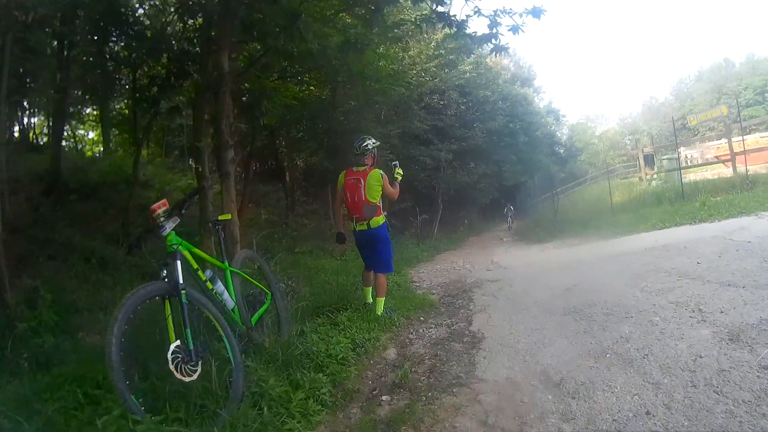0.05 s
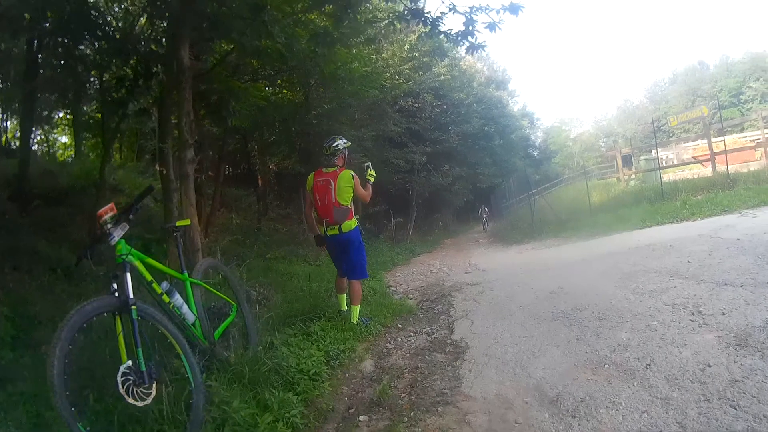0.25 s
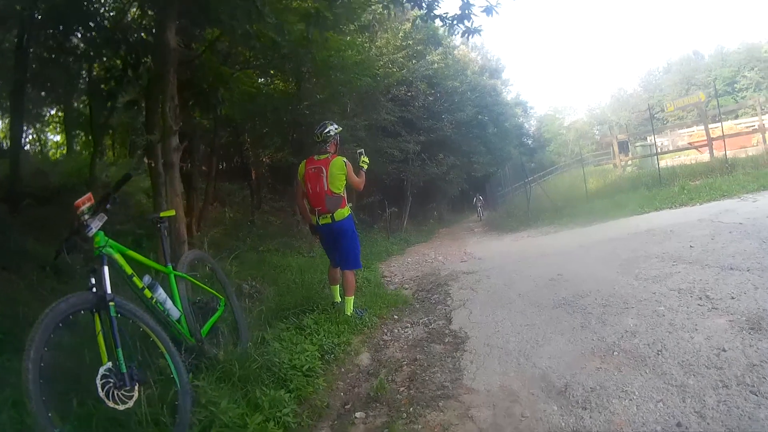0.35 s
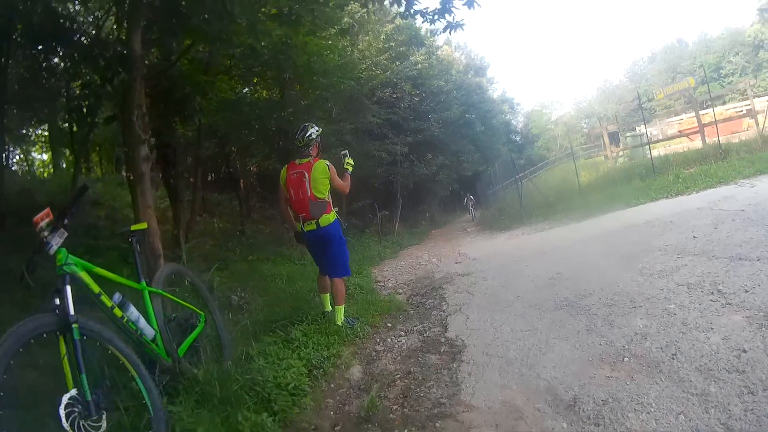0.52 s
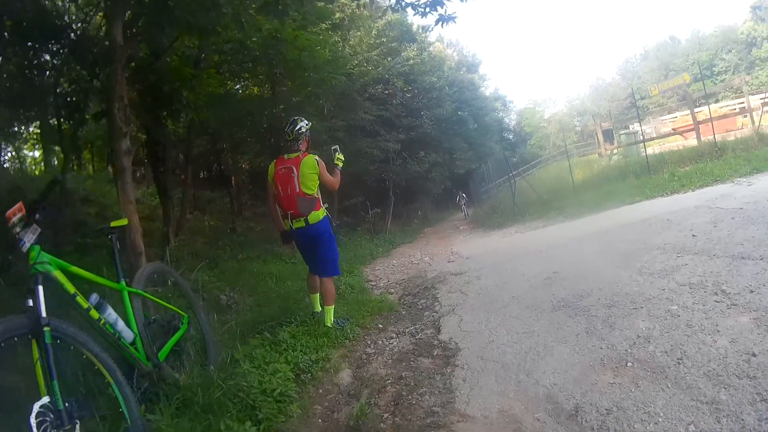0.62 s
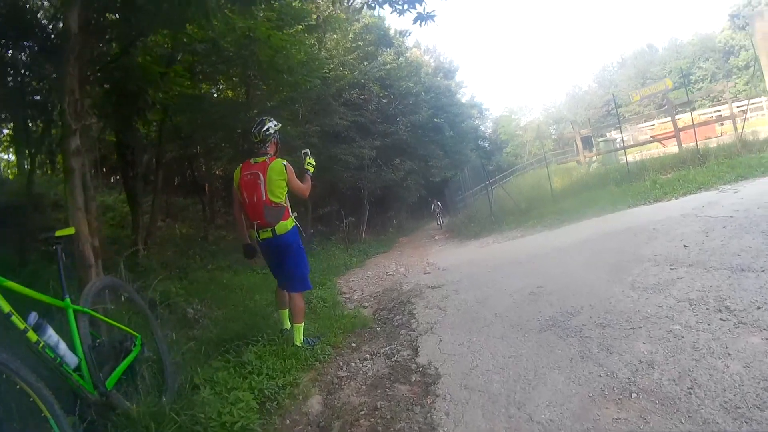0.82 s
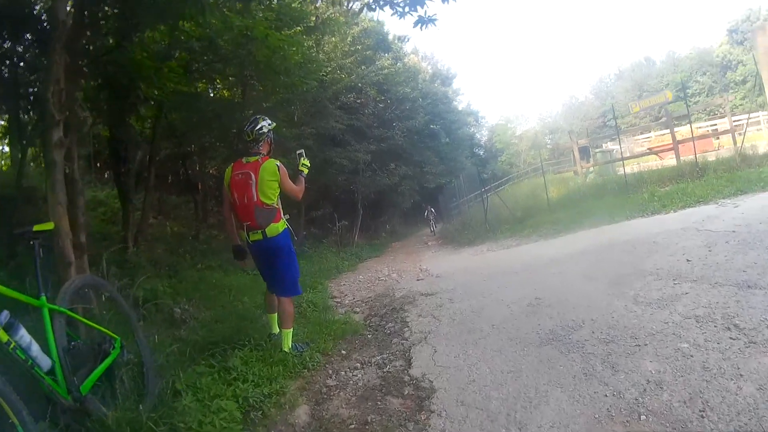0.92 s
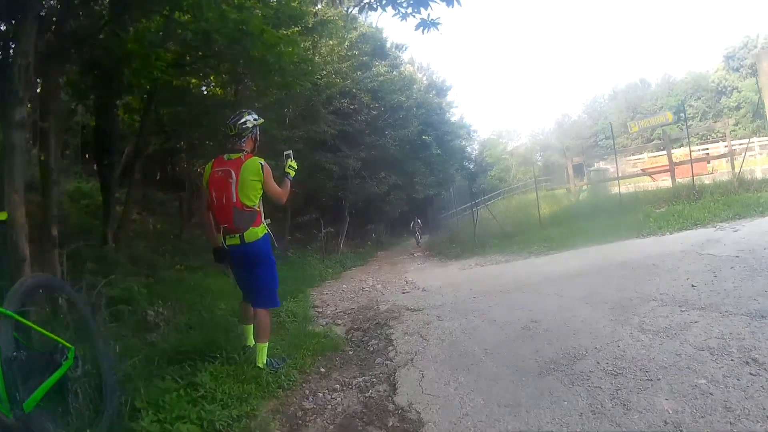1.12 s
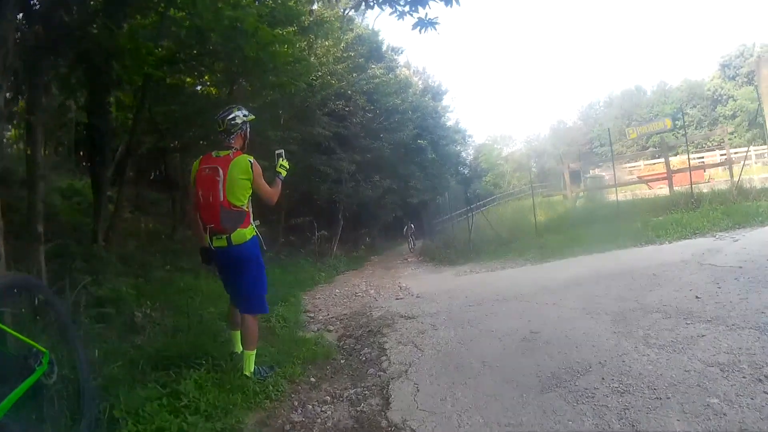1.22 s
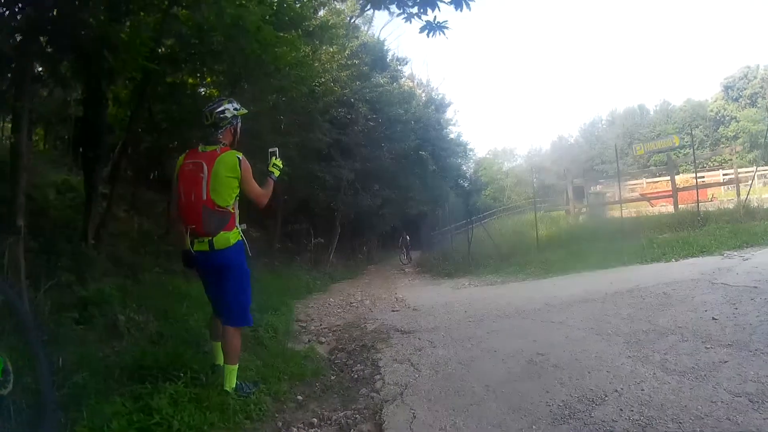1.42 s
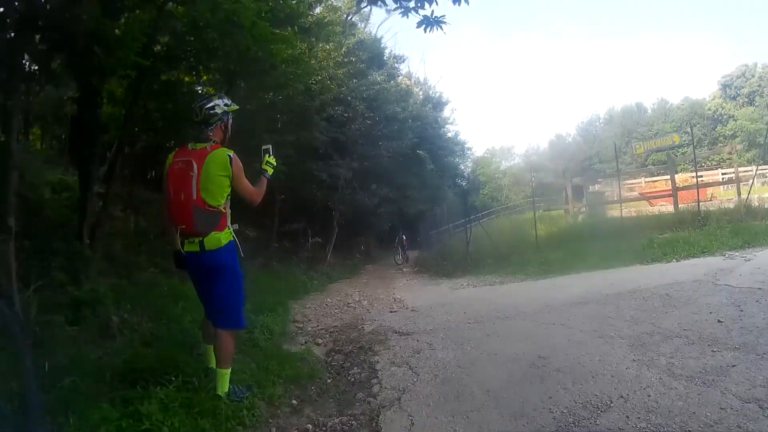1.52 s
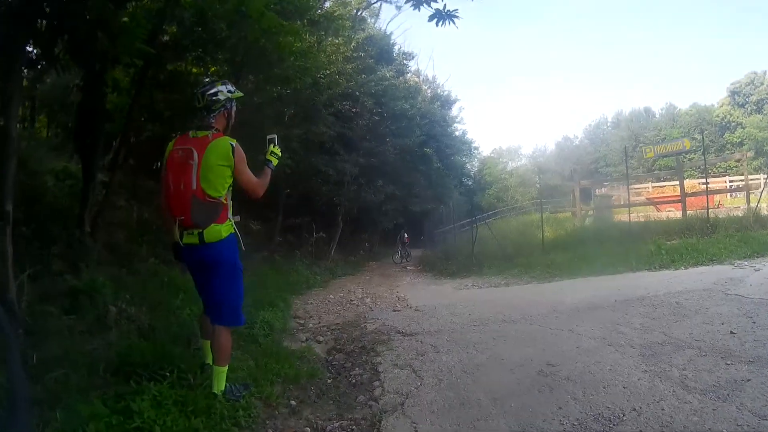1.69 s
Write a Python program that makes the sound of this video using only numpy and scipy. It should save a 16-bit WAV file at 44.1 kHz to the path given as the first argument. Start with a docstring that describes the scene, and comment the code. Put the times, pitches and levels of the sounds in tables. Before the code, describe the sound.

Slow bicycle tyres crunch over gravel, close and outdoors. Soft rumble and faint grit open; from 0.2 to 0.6 seconds stones crack hard, slightly overloading, with hollow knocks and bass bumps. The crunch thins, with separate knocks near 0.84, 0.9 and 1.13. A strong double thud lands around 1.37 and 1.42 with gritty scuffing, then only faint stone ticks near 1.65 over light hiss.

```python
"""On a gravel track, bicycle tyres roll slowly and come to a stop, close to the microphone.
Stones crack under the tread (sharp pushes), knock together (short hollow modes) and spit grit (noise snaps).
Pebbles clack, the tread scuffs loose grit, and bumps thud through the bike as short bass swings.
Rolling is rumbling noise and random clicks; stones leave a noise tail, over a faint hiss.
The crunch is dense at first, then thins to single stones, with a strong double thud near the end."""
import sys
import numpy as np
from scipy import signal
from scipy.io import wavfile
from scipy.ndimage import uniform_filter1d

SR = 44100
rng = np.random.default_rng(int(sys.argv[2]) if len(sys.argv) > 2 else 0)


def persist_wave(psi):
    """Save psi, clipped to +-1, as 16-bit WAV."""
    counts = np.round(np.clip(psi, -1, 1) * 32767).astype(np.int16)
    wavfile.write(sys.argv[1], SR, np.atleast_2d(counts).T)


N = 77175  # samples, 1.75 s
T = np.arange(N) / SR
BRIEF = T[:4096]  # time axis of one short sound, about 93 ms


def amp(db):
    """Turns decibels into gain."""
    return 10 ** (np.asarray(db) / 20)


def evened(x):
    """Scales a steady sound to rms 1."""
    return x / np.sqrt(np.mean(x ** 2) + 1e-20)


def blow(x):
    """Scales a short sound to the energy of one millisecond at full level."""
    return x / np.sqrt(np.sum(x ** 2) * 1000 / SR + 1e-20)


def add(mix, start_s, sound):
    """Mixes a sound in at its start time, cutting what runs past the end."""
    part = mix[max(round(start_s * SR), 0):][:len(sound)]
    part += sound[:len(part)]


def colour(x, points, tilt_db=0):
    """Filters through (Hz, dB) points, tilted per octave above the second point, with no pre-echo."""
    size = 8192
    octave = np.log2(abs(np.fft.fftfreq(size, 1 / SR)) + 1)
    hz, db = np.transpose(points)
    tilt = tilt_db * np.maximum(octave - np.log2(hz[1]), 0)
    log_gain = np.log(amp(np.interp(octave, np.log2(hz), db) + tilt))
    # The Hilbert transform finds the minimum phase that belongs to this gain
    spectrum = np.exp(np.conj(signal.hilbert(log_gain)))
    kernel = np.fft.ifft(spectrum).real[:size // 2]
    return signal.fftconvolve(x, kernel)[:len(x)]


def burst(decay_s):
    """Makes a brief puff of dying noise."""
    return rng.standard_normal(len(BRIEF)) * np.exp(-BRIEF / decay_s)


def patter(per_s, spread_db):
    """Scatters random clicks of very unequal size."""
    size = amp(spread_db * np.minimum(rng.exponential(1, N), 4))
    sign = rng.choice([-1, 1], N)
    return size * sign * (rng.random(N) < per_s / SR)


def swell(swell_s, decay_s):
    """Shapes a soft rise and an exponential fall."""
    rise = (1 - np.exp(-(BRIEF / swell_s) ** 2)) ** 2
    return rise * np.exp(-BRIEF / decay_s)


# Stones cracking under the tread: start_s, level_db, brightness_db_per_octave
CRACKS = [(.009, -21.5, -3.5), (0.2073, -5.5, -0.5), (.218, -16, 6.5), (0.2279, 0.5, -0.5), (.2335, -15, 0),
          (0.2403, -15, 8), (.2523, -11.5, 3), (0.2919, -24, 10), (.302, -13.5, 0.5), (.318, 1, 0),
          (.323, -9.5, -1.5), (0.3424, -17, 8), (.353, 0.5, 0.5), (0.3663, -9.5, 6.5), (0.3682, -4, 1.5),
          (.376, -3.5, -2), (.3785, -11, 6), (0.43, -6.5, -1.5), (0.4457, -17.5, 6.5), (.448, -15.5, 1),
          (1.024, -18.5, -0.5), (1.3728, -20.5, 2.5), (1.377, -22, 0.5), (1.4042, -13.5, -6.5),
          (1.417, -20, 1.5)]
# Tone of the push: frequency_hz, gain_db
CRACK_COLOUR = [(40, -1), (130, -3), (300, -7.5), (510, 7), (640, 2), (770, 0.5), (980, -7.5), (1400, -12),
                (1850, -7), (2600, -20), (4000, -24.5), (5600, -29.5), (8000, -67), (16000, -88)]
# Tone of the grating and the splinters: frequency_hz, gain_db
SPLINTER_COLOUR = [(100, -18.5), (700, -2.5), (1300, 3.5), (1900, 6.5), (2600, -7.5), (3800, -4.5),
                   (5600, -15), (7500, -23.5), (11000, -31.5), (16000, -39)]
SPLINTER_DB, SPLINTER_S = -13.5, 0.0025  # level for a crack of brightness 0, decay
STRAIN_SHARE, STRAIN_S, LEAD_S = .3, 0.0012, .008  # grating before the break: strength, swell, longest lead


def cracks():
    """A stone grates, gives way in one sharp push, and splinters follow."""
    out = np.zeros(N)
    lead = int(LEAD_S * SR)
    for start_s, level_db, bright_db in CRACKS:
        impulse = 1. * (BRIEF == 0)
        push = -blow(colour(impulse, CRACK_COLOUR, bright_db))
        grating = STRAIN_SHARE * burst(STRAIN_S)[:lead][::-1]  # reversed, so it grows
        splinters = blow(colour(np.r_[grating, burst(SPLINTER_S)], SPLINTER_COLOUR))
        add(out, start_s, amp(level_db) * push)
        # Brighter cracks splinter more loudly
        add(out, start_s - LEAD_S, amp(level_db + SPLINTER_DB + 2 * bright_db) * splinters)
    return out


# Stones knocking together: start_s, level_db, pitch_hz, brightness_db_per_octave
KNOCKS = [(.0505, -27, 1250, -10), (.085, -30, 1220, -13), (.1395, -25.5, 1270, -11),
          (.404, -3.5, 1214, 4.5), (.4465, -16, 1462, 9.5), (0.455, -18, 1285, 7),
          (0.5184, -14.5, 1240, 4.5), (.5305, -17.5, 1230, 2), (0.5356, 0, 1229, 2),
          (.5445, -7, 1093, -5.5), (0.557, -8, 1161, -0.5), (.594, -14.5, 1200, 1), (.604, -25.5, 1190, 2),
          (0.6253, -17.5, 1173, -4.5), (.651, -20, 1140, -2.5), (.698, -23.5, 1183, 6),
          (0.707, -28, 1260, -7), (.784, -27.5, 1257, 4), (.812, -24, 1198, 4), (.838, -8, 1146, 1.5),
          (0.9056, -6.5, 1156, 1.5), (1.126, -8.5, 1255, 4.5), (1.366, -23.5, 1250, 1),
          (1.403, -16.5, 1140, -11), (1.45, -21.5, 1286, -3), (1.5125, -38.5, 1194, 9),
          (1.636, -36, 1640, -6), (1.657, -23, 1269, -1.5), (1.663, -24, 1166, -8),
          (1.7265, -22.5, 1180, 6)]
# What a knock rings with: ratio_to_pitch, level_db, swell_s, decay_s, share_it_starts_sharp
KNOCK_MODES = [(.46, -5, 0.0047, 0.0046, 0.0097), (.66, -10.5, 0.003, 0.0099, 0.022),
               (.93, 1, .003, 0.0024, 0.36), (1.13, -5.5, 0.0034, 0.003, 0.016),
               (1.42, -9, 0.0032, 0.0027, 0.014), (2.55, -26, 0.002, 0.0046, 0.017),
               (3.1, -36.5, 0.0012, 0.006, 0.07)]
# Tone of the scrape in each knock: frequency_hz, gain_db
SCRAPE_COLOUR = [(100, 6.5), (930, -2.5), (1060, 10), (1400, 11.5), (1850, 3), (2150, -7), (3200, -18),
                 (4200, -21.5), (6000, -52), (16000, -53)]
SCRAPE_DB, SCRAPE_S = -7.5, 0.0017  # level against the ringing, noise decay
GLIDE_S = 0.0028  # time for the pitch to settle


def knocks():
    """Hollow modes swell, sag in pitch and die within milliseconds, with a rough scrape."""
    out = np.zeros(N)
    settle = GLIDE_S * (1 - np.exp(-BRIEF / GLIDE_S))
    for start_s, level_db, pitch_hz, bright_db in KNOCKS:
        ring = 0
        for ratio, mode_db, swell_s, decay_s, sharp in KNOCK_MODES:
            cycles = pitch_hz * ratio * (BRIEF + sharp * settle)
            wave = np.sin(2 * np.pi * (cycles + rng.random()))
            mode = blow(swell(swell_s, decay_s) * wave)
            ring = ring + amp(mode_db + bright_db * np.log2(ratio)) * mode
        scrape = blow(colour(BRIEF * burst(SCRAPE_S), SCRAPE_COLOUR, bright_db))
        add(out, start_s, amp(level_db) * blow(blow(ring) + amp(SCRAPE_DB) * scrape))
    return out


# Grit snapping: start_s, level_db
GRIT = [(.0053, -30.5), (0.0157, -28), (0.056, -35), (.16, -22), (0.209, -22), (0.216, -18), (0.228, -33),
        (0.2317, -28), (0.241, -36), (.2473, -22), (0.2536, -17), (.264, -33), (0.2948, -15.5),
        (0.301, -38), (0.3217, -19), (.341, -37), (0.354, -14.5), (0.3688, -29), (0.377, -56), (0.382, -47),
        (0.445, -35), (.4568, -30), (0.462, -26), (0.4686, -28), (0.4808, -28), (0.489, -37), (0.4955, -32),
        (0.5023, -23), (0.541, -20.5), (.545, -24), (0.593, -27), (0.643, -33), (0.653, -37), (0.665, -33),
        (0.7366, -35.5), (0.771, -22), (0.8778, -33), (0.888, -36), (1.033, -29.5), (1.122, -32.5),
        (1.147, -33.5), (1.1828, -26.5), (1.228, -35), (1.259, -39), (1.2904, -27), (1.3772, -19.5),
        (1.3849, -24), (1.4159, -30), (1.4202, -25), (1.4313, -26), (1.4431, -22.5), (1.467, -32)]
# Tone of grit, also used for the fine grit in rolling: frequency_hz, gain_db
GRIT_COLOUR = [(100, 27), (900, 5), (1800, 5.5), (2700, -1.5), (4200, -1), (5600, 1.5), (7000, -5),
               (9000, -8.5), (11400, -5.5), (12500, -16.5), (16000, -28)]
GRIT_RISE_S, GRIT_S = .0006, 0.00034  # rise and decay of the snap
GRIT_TAIL, GRIT_TAIL_S = 0.12, 0.0024  # weaker, longer part: strength, decay


def grit():
    """Tiny bright snaps are puffs of noise with a very short rise and fall."""
    out = np.zeros(N)
    rise = 1 - np.exp(-(BRIEF / GRIT_RISE_S) ** 2)
    for start_s, level_db in GRIT:
        snap = (burst(GRIT_S) + GRIT_TAIL * burst(GRIT_TAIL_S)) * rise
        add(out, start_s, amp(level_db) * blow(colour(snap, GRIT_COLOUR)))
    return out


# Small pebbles clacking: start_s, level_db, pitch_hz
CLACKS = [(.133, -60, 4100), (0.14, -31, 2900), (0.5303, -28, 3100), (0.678, -44, 3150), (0.783, -43, 2980),
          (0.813, -51, 3000), (.961, -54, 2840), (0.984, -48, 2830), (0.992, -45, 3120), (1.119, -34, 2800),
          (1.268, -38.5, 2750), (1.514, -46.5, 2950), (1.513, -50, 4170), (1.712, -49, 2960),
          (1.728, -45, 2680)]
CLACK_SWELL_S, CLACK_DECAY_S = 0.0011, 0.0023
CLACK_ROUGH = .6  # depth of a pebble's chatter


def clacks():
    """Each pebble chatters briefly and rings one short, high mode."""
    out = np.zeros(N)
    for start_s, level_db, pitch_hz in CLACKS:
        wobble = evened(uniform_filter1d(rng.standard_normal(len(BRIEF)), size=50))
        chatter = 1 + CLACK_ROUGH * wobble
        ring = swell(CLACK_SWELL_S, CLACK_DECAY_S) * np.sin(2 * np.pi * pitch_hz * BRIEF)
        add(out, start_s, amp(level_db) * blow(chatter * ring))
    return out


# Tread scuffing over loose grit: start_s, length_s, level_db
SCUFFS = [(.0, 0.045, -45), (0.043, 0.024, -45.5), (0.147, 0.031, -37), (0.234, 0.05, -41.5),
          (0.334, 0.02, -34), (0.428, 0.053, -37), (0.638, 0.027, -45.5), (0.819, 0.059, -45),
          (1.001, 0.034, -53), (1.053, 0.061, -50.5), (1.243, 0.038, -46.5), (1.328, 0.023, -47.5),
          (1.401, 0.071, -41)]
# Tone of the scuffs: frequency_hz, gain_db
SCUFF_COLOUR = [(100, -9), (900, -14.5), (1500, 16.5), (2000, 10.5), (2400, 6), (3100, -8.5), (4200, 10.5),
                (4900, -17), (7000, -9.5), (11400, -20), (12500, -19), (16000, -39)]


def scuffs():
    """Short rushes of many tiny grains are random clicks that swell and fade."""
    level = np.zeros(N)
    for start_s, length_s, level_db in SCUFFS:
        arch = np.hanning(max(int(length_s * SR), 3)) ** .5
        add(level, start_s, amp(level_db) * arch)
    grains = patter(per_s=3100, spread_db=5.5)
    return level * evened(colour(grains, SCUFF_COLOUR))


# Bumps thudding through the bike: start_s, level_db, pitch_hz
THUDS = [(0.034, -19.5, 79), (0.064, -22.5, 178), (.105, -26, 147), (0.175, -19, 89), (0.1481, -14.5, 242),
         (.22, -5, 94), (0.236, -12.5, 139), (0.2444, -10, 235), (0.253, -13, 153), (0.29, -15.5, 131),
         (.302, -7, 139), (0.308, -33, 240), (0.325, -13.5, 121), (0.341, -16, 134), (.357, -6, 146),
         (0.371, -17, 129), (0.429, -17, 172), (.444, -7, 184), (0.496, -15, 190), (0.531, -26, 123),
         (0.55, -13, 213), (0.5845, -13, 228), (0.647, -26, 107), (0.7595, -19, 202), (0.808, -24, 139),
         (0.852, -19, 233), (1.0232, -22.5, 287), (1.357, -15, 65), (1.3723, -5.5, 264), (1.416, -9.5, 240),
         (1.443, -30, 111), (1.657, -28.5, 275)]
THUD_CYCLES = 0.43  # cycles until the swell of a thud peaks
FRAME_HZ, FRAME_DECAY_S, FRAME_DB = 87.2, 0.052, -25.5  # low ring of the bike; level against the thud


def thuds():
    """Each bump is a cycle or two of bass and leaves the bike ringing."""
    out = np.zeros(N)
    t = T[:SR // 2]
    ring = np.exp(-t / FRAME_DECAY_S) * np.sin(2 * np.pi * FRAME_HZ * t)
    for start_s, level_db, pitch_hz in THUDS:
        age = t * pitch_hz / THUD_CYCLES
        envelope = age ** 2 * np.exp(-2 * age)
        bump = blow(-envelope * np.sin(2 * np.pi * pitch_hz * t))
        add(out, start_s, amp(level_db) * (bump + amp(FRAME_DB) * ring))
    return out


JOLT_S, JOLT_DB, JOLT_HZ, JOLT_DECAY_S = 1.417, -27.5, 83.3, 0.049  # start, level, pitch, decay


def shudder():
    """A hard jolt near the end leaves a louder low ring in the bike: one dying sine."""
    age = np.maximum(T - JOLT_S, 0)
    return amp(JOLT_DB) * np.exp(-age / JOLT_DECAY_S) * np.sin(2 * np.pi * JOLT_HZ * age)


# Uneven rolling, swelling and fading: time_s, rumble_db, crunch_db (before the lift below), fine_grit_db
ROLL = [(0.0, -31.5, -43, -35.5), (0.058, -62, -47, -56), (0.154, -38, -45.5, -80), (0.248, -29, -37, -42),
        (0.354, -31, -30.5, -71), (0.394, -26, -34.5, -61), (0.438, -29.5, -27.5, -52),
        (0.51, -34, -34, -64), (0.588, -34, -31, -52), (0.692, -37, -41, -64), (0.798, -37, -40.5, -51),
        (0.872, -43.5, -42.5, -63), (1.106, -39, -43, -56), (1.276, -40, -48.5, -59),
        (1.378, -33, -36, -70), (1.48, -49.5, -52, -54.5), (1.628, -48.5, -54.5, -95),
        (1.75, -39, -42, -57)]
# Tone of the tyre rumble: frequency_hz, gain_db
RUMBLE_COLOUR = [(15, 4.5), (28, -7.5), (50, 3), (68, -4), (88, 9), (115, -6.5), (200, -3), (320, -22),
                 (600, -32), (2000, -80)]
# Tone of the crunch: frequency_hz, gain_db
CRUNCH_COLOUR = [(100, -35), (250, -0.5), (400, 3.5), (530, 9.5), (620, 9), (690, -8), (780, -0.5),
                 (940, -10.5), (1080, 4.5), (1380, -4), (1800, -10), (2200, -23), (3000, -21.5),
                 (4200, -31.5), (5500, -79), (16000, -68)]
CRUNCH_LIFT_DB = 2
LUMP_DB, LUMP_S = 6.5, 0.045  # slow unevenness of the rumble: greatest rise or fall, half window length


def rolling():
    """Tyre rumble is lumpy noise; the crunch of small stones and the fine grit are random clicks."""
    time_s, *levels = np.transpose(ROLL)
    rumble_level, crunch_level, fine_level = (amp(np.interp(T, time_s, level)) for level in levels)
    window = np.hanning(int(2 * LUMP_S * SR))
    lumps = evened(signal.fftconvolve(rng.standard_normal(N), window, "same"))
    lumpy_noise = rng.standard_normal(N) * amp(LUMP_DB * np.tanh(lumps))
    rumble = evened(colour(lumpy_noise, RUMBLE_COLOUR))
    crunch = evened(colour(patter(per_s=840, spread_db=3), CRUNCH_COLOUR))
    fine = evened(colour(patter(per_s=1400, spread_db=7.5), GRIT_COLOUR))
    return rumble_level * rumble + amp(CRUNCH_LIFT_DB) * crunch_level * crunch + fine_level * fine


def after_ring(x, points, t60_s, level_db):
    """A diffuse, coloured tail: each sound is smeared by noise that falls 60 dB in t60_s."""
    tail = rng.standard_normal(N) * amp(-60 * T / t60_s) * (1 - np.exp(-T / 0.0017))
    smeared = signal.fftconvolve(x, tail / np.linalg.norm(tail))[:N]
    return amp(level_db) * colour(smeared, points)


# Tone of the quick scatter from the ground and the bike: frequency_hz, gain_db
EARLY_COLOUR = [(60, -8), (250, 0), (600, -1), (2500, -5), (16000, -12)]


def early_scatter(stones):
    """The ground and the bike scatter the stone sounds into a quick tail."""
    return after_ring(stones, EARLY_COLOUR, t60_s=.06, level_db=-13)


# Tone of the hollow after-ring of every stone: frequency_hz, gain_db
RING_COLOUR = [(60, -60), (250, -6), (400, -4.5), (540, 8.5), (680, 2.5), (775, 1), (930, -13), (1070, 1.5),
               (1200, -7), (1400, -2), (1800, -9), (2200, -9), (3100, -7.5), (6000, -47), (16000, -40)]
SHARP_RING_DB = -9  # cracks, grit and scuffs ring on less than knocks and clacks


def hollow_ring(sharp, hollow):
    """Every stone sound rings on in a longer, hollow tail."""
    return after_ring(amp(SHARP_RING_DB) * sharp + hollow, RING_COLOUR, t60_s=0.35, level_db=-15)


# Tone of the faint hiss: frequency_hz, gain_db
HISS_COLOUR = [(100, 8), (1500, -5), (4200, -5.5), (5000, -11), (10000, -9.5), (16000, -12)]


def hiss():
    """Faint steady noise lies under everything."""
    return amp(-67) * evened(colour(rng.standard_normal(N), HISS_COLOUR))


def scene():
    """Adds up stones and their tails, bumps, rolling and hiss."""
    sharp = cracks() + grit() + scuffs()
    hollow = knocks() + clacks()
    stones = sharp + hollow
    tails = early_scatter(stones) + hollow_ring(sharp, hollow)
    bike = thuds() + shudder()
    return (stones + tails + bike + rolling() + hiss())[None]


OVERLOAD = .72  # the level that peaks cannot pass
EDGE_HZ = 15900  # top of the band


def record(dry):
    """The loudest peaks overload the microphone and are rounded off; then the top of the band is cut."""
    clipped = dry / (1 + (dry / OVERLOAD) ** 8) ** (1 / 8)
    lowpass = signal.firwin(511, EDGE_HZ, window=("kaiser", 9), fs=SR)
    return signal.oaconvolve(clipped, lowpass[None], "same")


dry = scene()
out = record(dry)
persist_wave(out)
```